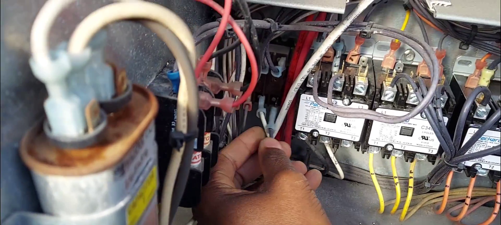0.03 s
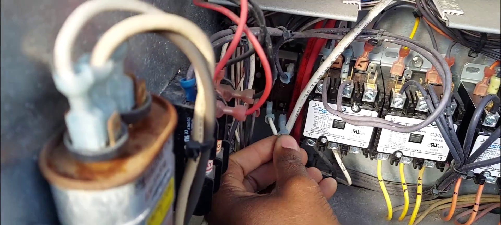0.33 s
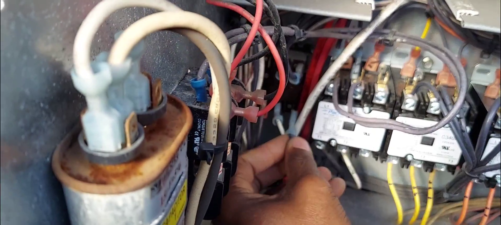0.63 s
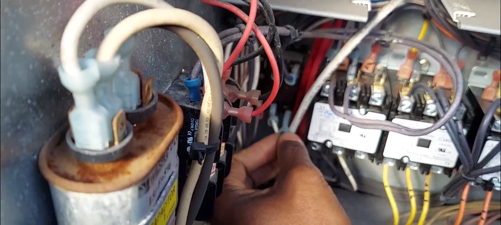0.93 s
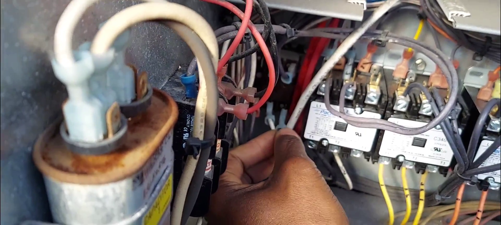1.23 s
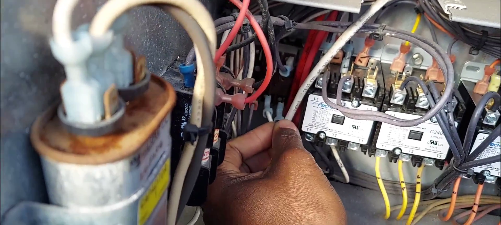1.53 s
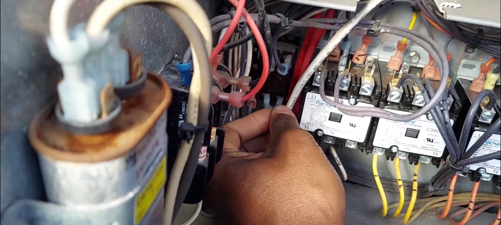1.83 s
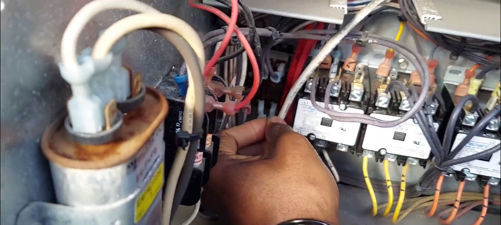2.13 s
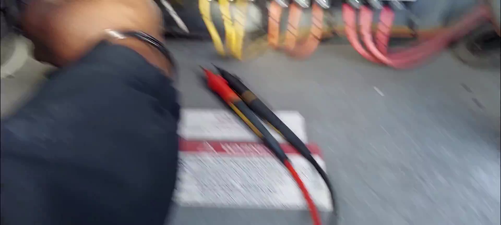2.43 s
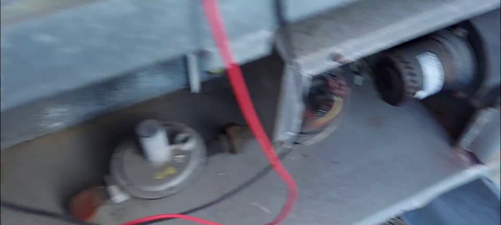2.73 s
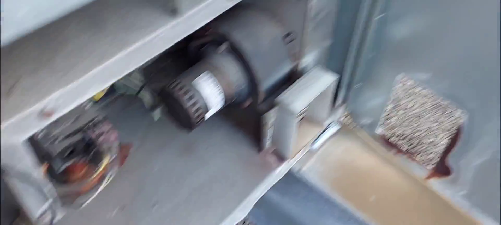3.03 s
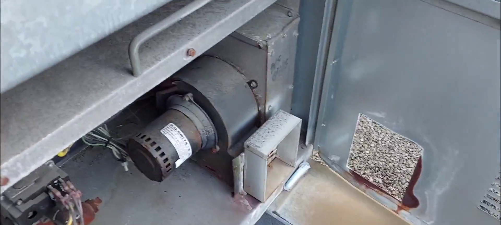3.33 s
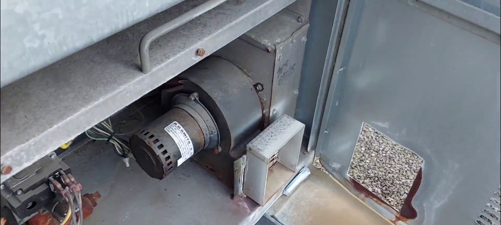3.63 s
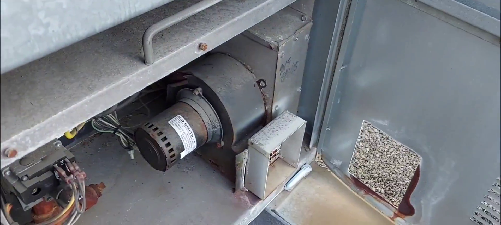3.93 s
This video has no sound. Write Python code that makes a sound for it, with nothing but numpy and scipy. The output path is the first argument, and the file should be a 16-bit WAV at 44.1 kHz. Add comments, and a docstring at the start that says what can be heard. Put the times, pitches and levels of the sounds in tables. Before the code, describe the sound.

An electric blower motor starts with a booming clack and hums, buzzing louder up close.

```python
"""Inside a rooftop furnace. Wind and machinery rumble throughout; a hand and sleeve brush the wires. At 1.45 s
a contactor slams in and the steel cabinet booms. The stalled inducer motor starts to hum and buzz at twice the
mains rate, and at 1.7 s a small relay snaps. From 2.1 to 3.4 s the microphone swings from the control box to
the motor, through its standing waves; the sleeve rustles again at 3.6 s."""
import sys
import numpy as np
from scipy import signal
from scipy.fft import rfft, irfft
from scipy.io import wavfile
from scipy.ndimage import uniform_filter1d

SR = 44100
rng = np.random.default_rng(int(sys.argv[2]) if len(sys.argv) > 2 else 0)


def dump(signal):
    """Clip the signal to [-1, 1] and save it as 16-bit WAV at the path in sys.argv[1]."""
    limited = np.clip(np.atleast_2d(signal).T, -1, 1)
    pcm = np.round(limited * 32767).astype(np.int16)
    wavfile.write(sys.argv[1], SR, pcm)


N = 176400
TIME, FREQS = np.arange(N) / SR, np.arange(N // 2 + 1) * SR / N
BUZZ_HZ, POWER_ON_S = 119.95, 1.46
LEFT, SPLIT = np.array([[1], [0]]), np.array([[.5], [-.5]])

# Path to the motor. Each row: time in seconds, buzz gain in dB, distance to go in metres.
MIC_PATH = [(1.5, -3, 1), (2.1, 0, 1), (2.35, -1, .75), (2.65, -2, .42), (2.95, -1.5, .14), (3.4, 0, 0),
            (4.0, 0, 0)]
# Buzz loss at the control box. Each row: frequency in Hz, loss in dB.
FAR_LOSS = [(900, 18), (1400, 21.5), (3800, 11.5), (12000, 16.5)]
# Antinodes crossed. Each row: middle in seconds, length in seconds, multiple of BUZZ_HZ, level in dB.
ANTINODES = [(2.0, .7, 28, -51), (2.1, 1.2, 24, -55), (2.12, .4, 29, -56), (2.12, .5, 19, -53),
             (2.15, .4, 32, -55), (2.2, 1.0, 35, -58), (2.52, .3, 22, -50), (2.64, .45, 30, -46),
             (2.76, .3, 18, -43), (2.78, .3, 23, -45), (2.95, .35, 42, -53), (2.82, .2, 19, -47),
             (2.93, .25, 29, -47), (2.96, .2, 32, -47), (3.65, .75, 24, -45.5), (3.8, .9, 43, -56),
             (3.9, .3, 21, -46), (3.92, .45, 20, -38.5), (3.95, .45, 30, -41)]
# Buzz balance. Each row: frequency in Hz, left minus right in dB.
BUZZ_PAN = [(500, -1.5), (2000, -14.5), (4500, -3), (6000, -1.5), (7500, 2), (15000, 3)]
def lamination_buzz(pattern_m=.236, diffuse_hz=1470, beam_above_hz=10000, hop=147):
    """Laminations chatter every half cycle; each partial fades in and out along the microphone's path."""
    level_db, to_go_m = in_time(MIC_PATH)[:, ::hop]
    beam_db = 5 * swell(3.1, .93)[::hop]  # the microphone crosses a narrow treble beam
    settled = np.exp(-(np.minimum(to_go_m, 1 - to_go_m) / pattern_m) ** 4)  # 1 at either end of the path
    mains = np.exp(1j * np.pi * BUZZ_HZ * TIME)
    out, wave = np.zeros((2, N)), np.ones(N, complex)
    for harmonic in range(1, 263):
        wave, hz = wave * mains, harmonic * BUZZ_HZ / 2
        if (harmonic < 14 and harmonic != 8) or harmonic in (18, 32):  # room for the hum
            continue
        slant, offset = rng.uniform(-1, 1, (2, 2, 4, 1))
        echoes = np.exp(1j * np.pi * (slant * to_go_m / pattern_m + offset)).sum(1) / 2
        apart_rad = min(hz / diffuse_hz, np.pi / 2) * rng.choice([-1, 1]) * (1 + rng.uniform(-.26, .59))
        direct = np.exp(1j * (2 * np.pi * rng.random() + apart_rad * LEFT))
        flutter = 3 * uniform_filter1d(rng.standard_normal((2, len(to_go_m))), size=9)
        field = settled * direct + np.sqrt(1 - settled ** 2) * echoes
        path_db = level_db - at_hz(FAR_LOSS, hz) * to_go_m + (hz > beam_above_hz) * beam_db
        peaks = sum(from_db(db) * swell(s, length)[::hop]
                    for s, length, multiple, db in ANTINODES if 2 * multiple == harmonic)
        gain = field * from_db(partial_db(harmonic) + path_db)
        gain += direct * peaks * panned(at_hz(BUZZ_PAN, hz))
        gain *= 1 + .07 * flutter
        step = np.diff(gain, append=gain[:, -1:])
        glide = gain[..., None] + step[..., None] * np.linspace(0, 1, hop, endpoint=False)
        out += np.sqrt(2) * (glide.reshape(2, -1)[:, :N] * wave).real
    return out

# Partials beside the motor. Each row: multiple of BUZZ_HZ, left level in dB, right level in dB.
PARTIALS = [(4, -48, -50), (7, -44, -43), (8, -48, -50), (10, -46, -39), (11, -44, -46), (12, -47, -45),
            (13, -55, -43), (14, -48, -43), (15, -45, -45), (17, -48, -42), (18, -46, -43), (19, -48, -44),
            (20, -53, -43), (21, -47, -39), (22, -46, -44), (23, -54, -39), (24, -46, -41), (25, -66, -54),
            (26, -51, -46), (27, -49, -43), (28, -58, -48), (29, -48, -43), (30, -52, -41), (31, -53, -49),
            (32, -51, -43), (33, -58, -48), (41, -54, -49), (42, -53, -47), (43, -52, -47)]
# Envelope of the high partials. Each row: frequency in Hz, level in dB.
TREBLE = [(4000, -53.5), (5150, -56.5), (5700, -62.5), (6300, -56), (6900, -71.5), (7500, -67.5),
          (8500, -70), (9300, -86), (11200, -79), (15800, -78.5)]
# Random scatter of partial levels. Each row: frequency in Hz, spread in dB.
SCATTER = [(4000, 3), (7500, 6), (11000, 4)]
def partial_db(harmonic):
    """Left and right level of a mains harmonic at the motor; unequal half cycles give the odd ones."""
    hz = harmonic * BUZZ_HZ / 2
    for multiple, left, right in PARTIALS:
        if 2 * multiple == harmonic:
            return np.array([[left], [right]])
    typical = [(multiple * BUZZ_HZ, (left + right) / 2) for multiple, left, right in PARTIALS]
    db = at_hz(typical if hz < TREBLE[0][0] else TREBLE, hz)
    db += harmonic % 2 * at_hz([(3000, -19), (12000, -1)], hz)
    return db + at_hz(SCATTER, hz) * rng.standard_normal() + at_hz(BUZZ_PAN, hz) * SPLIT

# Hiss spectrum. Each row: frequency in Hz, relative density in dB.
HISS = [(200, -13.5), (700, 3.5), (1200, -9.5), (2500, -4.5), (4500, -5), (6500, -13.5), (8500, -18.5),
        (15800, -26.5)]
def lamination_hiss(level_db=-44, loss_db_per_m=8):
    """The chattering laminations hiss in pulses, louder near the motor."""
    _, to_go_m = in_time(MIC_PATH)
    pulsing = 1 + .45 * np.cos(2 * np.pi * BUZZ_HZ * TIME)
    hiss = noise(HISS, at_hz(BUZZ_PAN, FREQS) * SPLIT)
    return from_db(level_db - loss_db_per_m * to_go_m) * pulsing * hiss

# Hum tones along the path. Each row: time in seconds, left level in dB, right level in dB.
HUM_240_HZ = [(1.53, -23, -30), (1.65, -18, -21), (2.25, -18, -21), (2.4, -21, -28), (2.5, -24, -35),
              (2.65, -35, -23), (2.8, -28, -20), (3.2, -24, -20), (3.93, -27, -23)]
HUM_360_HZ = [(1.6, -50, -54), (2.25, -44, -43), (2.45, -43, -30), (2.6, -32, -25), (2.8, -26, -23),
              (3.1, -26, -27), (3.93, -30, -32)]
HUM_720_HZ = [(1.75, -45, -49), (2.1, -39, -50), (2.45, -40, -53), (2.62, -42, -38), (2.8, -46, -31),
              (3.0, -32, -28), (3.2, -27, -28), (3.93, -26, -26)]
# Whines along the path. Each row: time in seconds, level in dB.
WHINE_1080_HZ = [(1.6, -65), (2.2, -52), (2.55, -45), (2.8, -38), (3.1, -42), (4.0, -44)]
WHINE_1920_HZ = [(1.6, -64), (2.2, -57), (2.6, -46), (2.78, -46), (2.95, -35), (3.6, -34), (4.0, -39)]
# Nodes crossed. Each row: middle in seconds, length in seconds, multiple of BUZZ_HZ.
NODES = [(2.2, .8, 3), (2.57, .4, 2), (2.58, .55, 6)]
def housing_hum(whine_pan_db=-4.5, left_lead_s=.00011, rise_s=.024):
    """Magnetic pull shakes the motor housing: three low tones and two whines."""
    pan_db = whine_pan_db * SPLIT
    tones = [(2, in_time(HUM_240_HZ)), (3, in_time(HUM_360_HZ)), (6, in_time(HUM_720_HZ)),
             (9, in_time(WHINE_1080_HZ) + pan_db), (16, in_time(WHINE_1920_HZ) + pan_db)]
    out = 0
    for multiple, db in tones:
        at_node = sum(swell(s, length) for s, length, k in NODES if k == multiple)
        phase = 2 * np.pi * (multiple * BUZZ_HZ * (TIME + left_lead_s * LEFT) + rng.random())
        phase += np.pi * at_node * LEFT  # microphone ports astride a node are in antiphase
        out += from_db(db + .5 * drift(21)) * np.sqrt(2) * np.sin(phase)
    return out * power_on(rise_s)

# Armature blows. Each row: start in seconds, clack level in dB, thump level in dB.
BLOWS = [(1.452, -22.5, -36.5), (1.456, -19, -12.5), (1.4646, -23.5, -16), (1.4715, -33.5, -12),
         (1.4762, -33, -20), (1.4825, -30.5, -10)]
# Steel cabinet modes. Each row: frequency in Hz, gain in dB, T60 in seconds.
CABINET_MODES = [(183, -4.5, .22), (218.6, -2.5, 0.68), (263, 0.5, 0.076), (335, -15.5, 0.075),
                 (360.5, -8, 0.32), (537.5, -13, 0.31), (627, -18.5, 0.18), (740, -18, 0.13)]
# Clack and rasp spectra. Each row: frequency in Hz, relative density in dB.
CLACK = [(700, -5), (1300, -2), (2000, 2.5), (2800, 2.5), (3700, 3), (4600, -11), (6300, -12.5),
         (9300, -26.5), (15800, -30.5)]
RASP = [(1400, 0.5), (2300, 11.5), (5000, -11), (15000, -37)]
def contactor(low_cut_hz=105, left_lag_s=.00044):
    """The armature clacks and bounces, each blow setting the cabinet booming; a brief rasp follows."""
    boom = sum(from_db(thump_db + mode_db) * decay(s, t60_s) * np.sin(2 * np.pi * hz * (TIME - s))
               for s, _, thump_db in BLOWS for hz, mode_db, t60_s in CABINET_MODES)
    radiation = signal.butter(2, low_cut_hz, "high", fs=SR, output="sos")  # the booms are kept above about 105 Hz
    boom = signal.sosfilt(radiation, boom)
    boom = np.array([np.interp(TIME - left_lag_s, TIME, boom), boom])
    rasp = from_db(-38) * swell(1.577, .14) * noise(RASP)
    return boom + panned(db=-3.5) * (clicks(BLOWS, CLACK, t60_s=.055) + rasp)

# Relay contact hits. Each row: start in seconds, level in dB.
RELAY_HITS = [(1.6965, -23), (1.698, -23), (1.7005, -28.5)]
# Snap spectrum. Each row: frequency in Hz, relative density in dB.
SNAP = [(900, -3.5), (1500, 4), (2700, -4), (3900, 0), (4700, -6.5), (6100, 0.5), (9400, -17.5),
        (11000, -8), (15800, -3.5)]
def relay():
    """The relay's contacts snap shut and bounce."""
    return panned(db=-4) * clicks(RELAY_HITS, SNAP, t60_s=.05)

# Wire ticks. Each row: start in seconds, level in dB.
WIRE_TICKS = [(.043, -44), (1.2915, -48), (1.328, -47)]
# Sleeve brushes. Each row: middle in seconds, length in seconds, level in dB.
BRUSHES = [(0.071, 0.16, -48), (0.425, 0.18, -45.5), (0.95, 0.63, -55.5), (3.593, 0.17, -42)]
# Rustle spectrum. Each row: frequency in Hz, relative density in dB.
RUSTLE = [(500, -8.5), (1700, 4), (5000, -12), (9500, -20.5), (15800, -27)]
def hand_on_wires():
    """Hand and sleeve rustle; the wires tick."""
    rustle = sum(from_db(db) * swell(s, length) for s, length, db in BRUSHES) * noise(RUSTLE)
    return rustle * from_db(.85 * drift(60)) + clicks(WIRE_TICKS, CLACK, t60_s=.074)

# Rumble spectrum. Each row: frequency in Hz, relative density in dB.
RUMBLE = [(20, -39), (33, -28), (52, -0.5), (70, -4), (220, -13), (400, -13), (600, -22), (900, -27.5),
          (1800, -32.5), (3300, -43), (5000, -55), (15800, -79)]
# Resonant peaks in the rumble. Each row: frequency in Hz, width in Hz, boost in dB.
RUMBLE_PEAKS = [(89.9, 10.9, 15.36), (116.2, 36, 8.1), (180.8, 22, 10.3), (266, 16.7, 10.7)]
# Rumble envelope. Each row: time in seconds, level in dB.
RUMBLE_LEVEL = [(0, -24), (1.1, -23.5), (2.0, -25.5), (2.6, -27), (4.0, -28.5)]
def rooftop_rumble():
    """Wind and machinery rumble on the roof, with a few resonant peaks."""
    boost_db = sum(db / (1 + (2 * (FREQS - hz) / width) ** 2) for hz, width, db in RUMBLE_PEAKS)
    return from_db(in_time(RUMBLE_LEVEL)) * noise(RUMBLE, boost_db)

# Stereo likeness of the noise. Each row: frequency in Hz, left-right correlation.
CORRELATION = [(130, 0.97), (290, 0.66), (640, 0.42), (1400, -0.63), (3100, 0.31), (15000, -0.1)]
def noise(spectrum, extra_db=0):
    """Coloured stereo noise of rms 1, alike in the bass and diffuse in the treble."""
    mid, side = rfft(rng.standard_normal((2, N)))
    alike = at_hz(CORRELATION, FREQS)
    stereo = np.sqrt(1 + alike) * mid + np.sqrt(1 - alike) * side * [[1], [-1]]
    out = irfft(stereo * from_db(at_hz(spectrum, FREQS) + extra_db), N)
    return out / out.std()

def clicks(hits, spectrum, t60_s, tail_db=-23.5, tail_t60_s=.25):
    """Hard contacts excite a dense, short ring and a faint tail in the control box."""
    power = sum(from_db(db) ** 2 * (decay(s, t60_s) ** 2 + (from_db(tail_db) * decay(s, tail_t60_s)) ** 2)
                for s, db, *_ in hits)
    return np.sqrt(power) * noise(spectrum)

def decay(start_s, t60_s, rise_s=.001):
    """Fast rise, exponential fall."""
    rise = np.clip((TIME - start_s) / rise_s + .5, 0, 1)
    return rise * np.exp(-np.log(1000) * np.clip((TIME - start_s) / t60_s, 0, 10))

def swell(middle_s, length_s):
    """Smooth rise and fall."""
    return np.cos(np.pi * np.clip((TIME - middle_s) / length_s, -.5, .5)) ** 2

def power_on(rise_s):
    """Ramp from 0 to 1 as the motor starts."""
    return np.clip((TIME - POWER_ON_S) / rise_s, 0, 1)

def drift(rate_hz):
    """Smooth random curve of spread 1."""
    pole = np.exp(-200 * np.pi * rate_hz / SR)
    slow = signal.lfilter([1], [1, -2 * pole, pole ** 2], rng.standard_normal(N // 100 + 1002))[1000:]
    return np.interp(TIME * SR / 100, np.arange(len(slow)), slow / slow.std())

def in_time(rows):
    """Each column of a curve at every sample."""
    times_s, *columns = np.transpose(rows)
    return np.array([np.interp(TIME, times_s, column) for column in columns])

def at_hz(rows, hz):
    """Interpolate on a log-frequency axis."""
    points_hz, values = np.transpose(rows)
    return np.interp(np.log(np.maximum(hz, 1)), np.log(points_hz), values)

def panned(db):
    """Stereo gains for a left-minus-right level."""
    return from_db(SPLIT * db)

def from_db(db):
    """Decibels to gain."""
    return 10 ** (np.asarray(db) / 20)

def scene():
    """All sources at the microphone."""
    mix = rooftop_rumble() + hand_on_wires() + relay() + contactor() + housing_hum()
    return mix + (lamination_buzz() + lamination_hiss()) * power_on(rise_s=.35) ** 2

def record(dry):
    """Clip at full scale, then low-pass at 15.9 kHz."""
    low_pass = signal.ellip(12, .1, 90, 15900, fs=SR, output="sos")
    return signal.sosfilt(low_pass, np.clip(dry, -1, 1))

dry = scene()
out = record(dry)
dump(out)
```